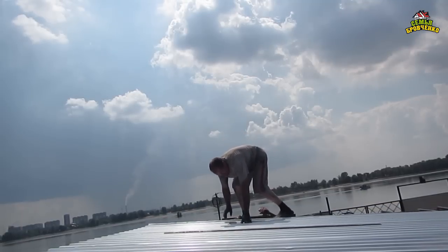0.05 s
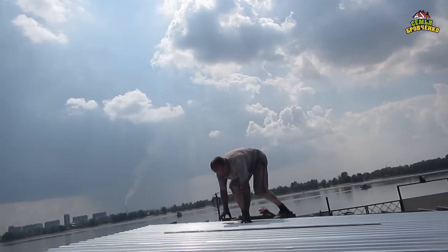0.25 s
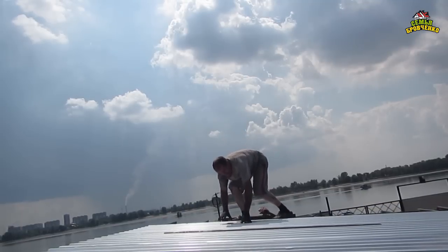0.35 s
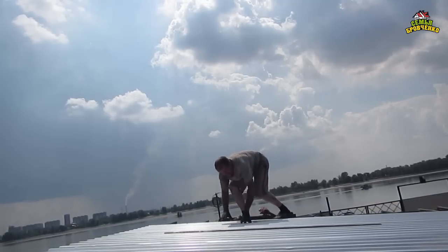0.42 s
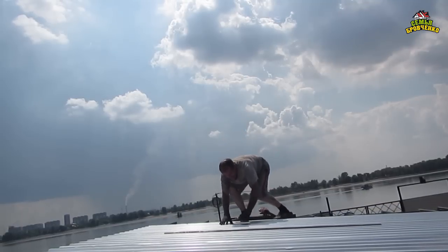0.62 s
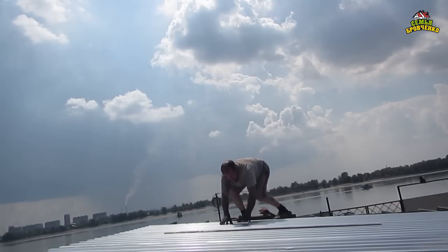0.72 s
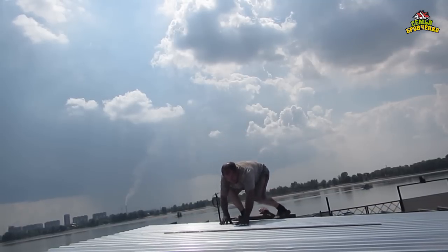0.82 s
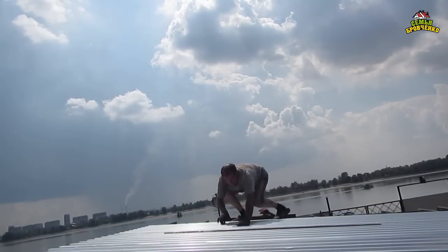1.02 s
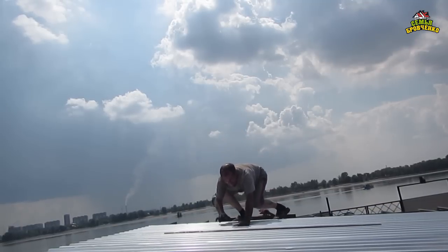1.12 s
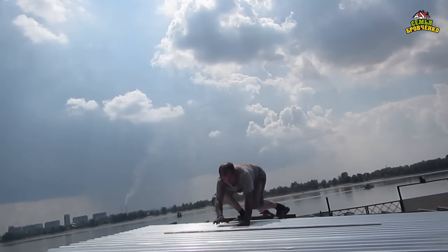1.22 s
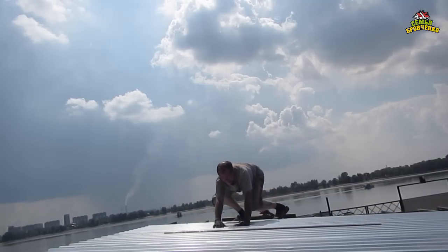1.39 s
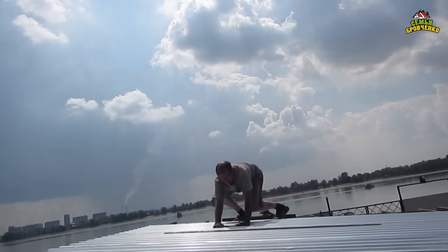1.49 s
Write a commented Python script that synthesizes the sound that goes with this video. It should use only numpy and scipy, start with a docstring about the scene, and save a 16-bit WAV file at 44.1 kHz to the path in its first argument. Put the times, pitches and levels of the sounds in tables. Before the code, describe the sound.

Corrugated metal roofing bangs loudly as it buckles under someone crawling across it. The seams rattle as the sheet rings out, then a duller thump follows. It is close to the microphone, outdoors, with faint hum and insects behind.

```python
"""A loud bang of corrugated metal close by, outdoors: someone is crawling over a roof and a panel
buckles under the weight. Its seams chatter as the sheeting rings out, and a duller thump follows
as a limb comes down. Two small dry ticks sound near the mono microphone. Far behind the roof lie
a faint outdoor hum and a thin, steady band of insect song."""
import sys
import numpy as np
from scipy import signal
from scipy.fft import rfft, irfft, next_fast_len
from scipy.io import wavfile
from scipy.ndimage import uniform_filter1d

SR = 44100
rng = np.random.default_rng(int(sys.argv[2]) if len(sys.argv) > 2 else 0)


def generate_wav(sig):
    """Save sig (samples, or channels by samples) to the path in sys.argv[1] as 16-bit PCM at SR."""
    pcm = np.round(np.clip(np.atleast_2d(sig).T, -1, 1) * 32767).astype(np.int16)
    wavfile.write(sys.argv[1], SR, pcm)


N = 68355
T = np.arange(N) / SR

# quick jolts of the buckling panel: start_s, level_db
JOLTS = [(.198, -20), (.208, -17.5), (.2205, -16.5), (.238, -23)]
# spectrum of a jolt: pitch_hz, level_db
JOLT_COLOUR = [(35, -26), (65, -20), (130, -12), (270, -11), (480, -4), (1200, 0), (1850, -4), (3200, -10),
               (7000, -9), (9000, -20.5), (12000, -33), (15500, -40)]
# soft, heavy contacts of the body with the roof: start_s, level_db
THUMPS = [(.191, -27), (.9635, -32), (.968, -28.5), (1.003, -35), (1.029, -42.5), (1.455, -51)]
# spectrum of a thump: pitch_hz, level_db
THUMP_COLOUR = [(35, -21), (65, -9.5), (140, -6.5), (260, -3.5), (500, -2.5), (900, -1), (1400, -10.5),
                (2100, -12), (3800, -22), (8000, -28), (15500, -64)]
# time the whole roof takes to fade by 60 dB: pitch_hz, t60_s
SHEET_T60 = [(60, 3.5), (150, 2.93), (350, 1.83), (1000, 1.385), (2500, 1.345), (6000, 0.84), (14000, 0.46)]
# the panel's strongest modes: pitch_hz, level_db, t60_s
PANEL_MODES = [(241, -32.5, 1.97), (471, -16.5, 0.57), (836, -25, 0.87), (894, -15.5, 0.96),
               (1198, -12.5, 0.91), (1444, -35, 0.69), (1765, -37, 0.44), (1995, -20.5, 1.06),
               (2239, -33, .6), (3140, -31, 1.1), (5420, -25.5, 1.25), (7075, -33, .9)]
# bursts of chatter where the sheets overlap: start_s, level_db, t60_s
CHATTERS = [(.316, -23.5, 0.29), (.414, -26.5, 0.27), (.489, -38, 0.22), (0.566, -35.5, 0.31),
            (.664, -40.5, 0.19), (.694, -41, 0.2), (.81, -46.5, 0.15), (0.946, -44, 0.52), (1.0, -45, 0.38),
            (1.1, -42.5, 0.54), (1.444, -45, 0.84), (1.49, -55.5, 0.54)]
# spectrum of the chatter: pitch_hz, level_db
CHATTER_COLOUR = [(100, -9), (600, -7), (1800, 2), (3200, -2), (5500, -0.5), (7400, -0.5), (9000, -11.5),
                  (12000, -26), (15500, -28)]
# dry ticks near the microphone: centre_s, level_db
TICKS = [(.171, -26.5), (.855, -24.5)]
# spectrum of the insect song: pitch_hz, level_db
INSECT_COLOUR = [(5500, -38), (7200, -16), (7700, -5), (8200, -8), (8700, -19), (10500, -36)]
# spectrum of far hum and wind: pitch_hz, level_db
AIR_COLOUR = [(25, -16), (45, -7.5), (70, 1), (130, -5.5), (300, -4), (800, -9), (1800, -13), (3000, -19.5),
              (6000, -23.5), (10000, -29), (15500, -42.5)]


def buckling_panel():
    """The panel gives way under the weight in quick jolts and snaps through."""
    return blows(JOLTS, JOLT_COLOUR, modes_db=0) + snap()


def snap(start_s=.2203, level_db=-4, centre_hz=1390, width_octaves=1.38):
    """The snap-through sends out a pulse; bending waves carry treble fastest, so it lands as a chirp."""
    size, travel_s = 4096, .001897  # travel time at 1 kHz
    hz = np.fft.rfftfreq(size, 1 / SR) + 1
    spectrum = np.exp(-.5 * (np.log2(hz / centre_hz) / width_octaves) ** 2)
    phase = 4 * np.pi * travel_s * np.sqrt(1000 * hz)  # speed grows as the root of frequency
    chirp = irfft(spectrum * np.exp(-1j * phase))[:size // 2]
    chirp /= np.abs(chirp).max()
    return from_db(level_db) * starting(start_s, np.pad(chirp, (0, N)))


def limb_thumps():
    """Limbs come down on the metal, soft and heavy, and ring it with a duller sound."""
    return blows(THUMPS, THUMP_COLOUR, modes_db=4.5)


def blows(rows, colour, modes_db):
    """Every blow rings the sheeting and the panel's modes."""
    return sum(from_db(db) * starting(start_s, sheet_ring(colour) + from_db(modes_db) * panel_ring(colour))
               for start_s, db in rows)


def sheet_ring(colour, near_db=-4.5, near_t60_s=.1, roof_db=-6):
    """Countless crowded modes ring briefly near the blow and long across the roof, the bass longest."""
    size = next_fast_len(N)
    hz = np.fft.rfftfreq(size, 1 / SR)
    spectrum = rfft(coloured(rng.standard_normal(N), colour), size)
    log_centres = np.log([centre_hz for centre_hz, _ in SHEET_T60])
    near = from_db(near_db) * dying(near_t60_s)
    out = 0
    for share, (_, t60_s) in zip(np.eye(len(SHEET_T60)), SHEET_T60):
        crossfade = np.interp(np.log(hz + 1), log_centres, share)
        band = irfft(spectrum * crossfade, size)[:N]
        out += band * (near + from_db(roof_db) * dying(t60_s))
    return out


def panel_ring(colour, scatter_db=2):
    """The strongest modes, struck a little differently each time; soft blows reach the high ones less."""
    out = 0
    for hz, db, t60_s in PANEL_MODES:
        softness_db = at_hz(colour, hz) - at_hz(JOLT_COLOUR, hz)
        gain = from_db(db + softness_db + scatter_db * rng.normal())
        out += gain * dying(t60_s) * np.sin(2 * np.pi * (hz * T + rng.random()))
    return out


def seam_chatter(contacts_per_s=1500, rise_s=.0022, ring_t60_s=.045, spread_db=4):
    """Overlapping sheets rattle in bursts of tiny metal-on-metal contacts, each with a short ring."""
    rise = 1 - np.exp(-T / rise_s)
    bursts = sum(from_db(db) * starting(start_s, rise * dying(t60_s)) for start_s, db, t60_s in CHATTERS)
    contacts = (rng.random(N) < contacts_per_s / SR) * rng.choice([-1, 1], N)
    strength = from_db(spread_db * np.minimum(rng.exponential(1, N), 3))
    ring = rng.standard_normal(N) * dying(ring_t60_s)
    rattle = signal.fftconvolve(contacts * strength, ring)[:N]
    return bursts * coloured(rattle, CHATTER_COLOUR)


def ticks(pitch_hz=7100, width_s=.00033):
    """High, dry ticks close by, each a few cycles long."""
    out = 0
    for centre_s, db in TICKS:
        t = T - centre_s
        out += from_db(db) * np.exp(-(t / width_s) ** 2) * np.sin(2 * np.pi * pitch_hz * t)
    return out


def insects(level_db=-51.5, flutter_db=1, flutter_s=.005):
    """Insects shrill in a narrow band behind the roof; the level flutters slightly."""
    flutter = rms_one(uniform_filter1d(rng.standard_normal(N), int(flutter_s * SR)))
    shrill = coloured(rng.standard_normal(N), INSECT_COLOUR + [(SR / 2, -90)])
    return from_db(level_db + flutter_db * flutter) * shrill


def distant_air(level_db=-48.5):
    """Far hum and wind reach the microphone as a steady, low noise."""
    return from_db(level_db) * coloured(rng.standard_normal(N), AIR_COLOUR)


def from_db(db):
    """Decibels to gain."""
    return 10 ** (np.asarray(db) / 20)


def rms_one(x):
    """Scale to rms 1."""
    return x / np.sqrt(np.mean(x ** 2) + 1e-20)


def at_hz(colour, hz):
    """Read a spectrum's level in dB on a log-frequency axis."""
    pitch_hz, level_db = np.transpose(colour)
    return np.interp(np.log(np.maximum(hz, 1)), np.log(pitch_hz), level_db)


def dying(t60_s):
    """A decay of 60 dB in t60_s seconds."""
    return np.exp(-np.log(1000) * T / t60_s)


def starting(start_s, x):
    """Delay a sound to its moment."""
    return np.concatenate([np.zeros(int(start_s * SR)), x])[:N]


def coloured(x, colour):
    """Give a steady sound a spectrum, at rms 1."""
    size = next_fast_len(N)
    gain = from_db(at_hz(colour, np.fft.rfftfreq(size, 1 / SR)))
    return rms_one(irfft(rfft(x, size) * gain, size)[:N])


def scene():
    """One microphone, with the roof close by and the open air behind."""
    roof = buckling_panel() + limb_thumps() + seam_chatter()
    return (roof + ticks() + insects() + distant_air())[None]


def record(dry):
    """The recorder clips any peak over full scale and cuts the highest treble."""
    lowpass = signal.cheby2(16, 80, 16450, fs=SR, output="sos")  # 80 dB down from 16450 Hz
    return signal.sosfilt(lowpass, np.clip(dry, -1, 1))


dry = scene()
out = record(dry)
generate_wav(out)
```